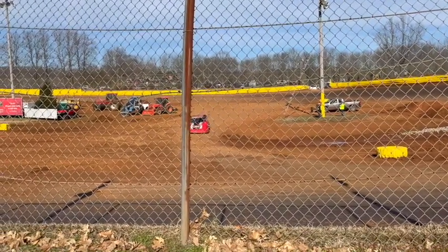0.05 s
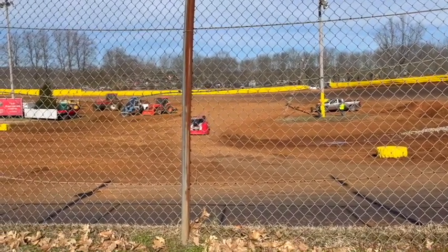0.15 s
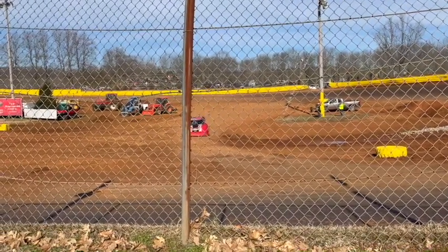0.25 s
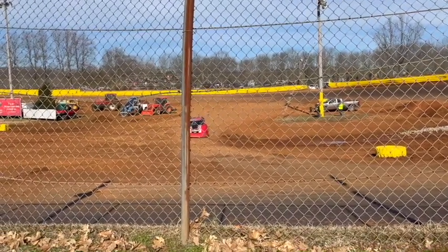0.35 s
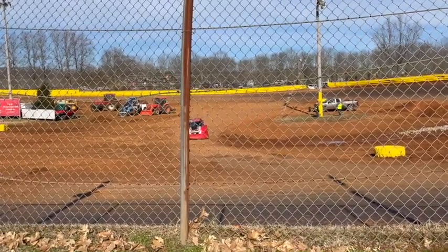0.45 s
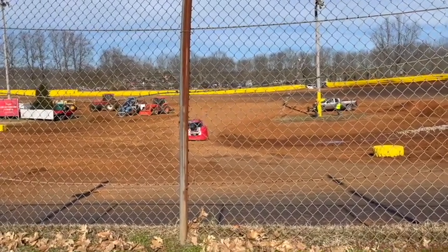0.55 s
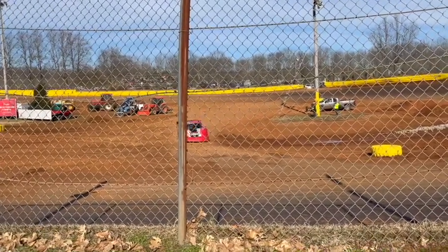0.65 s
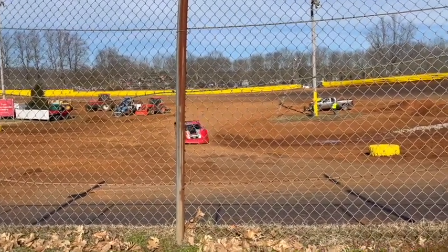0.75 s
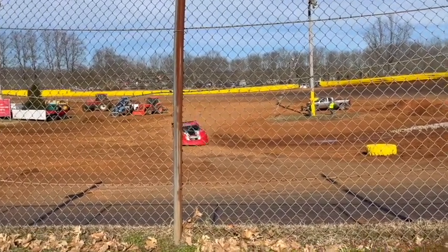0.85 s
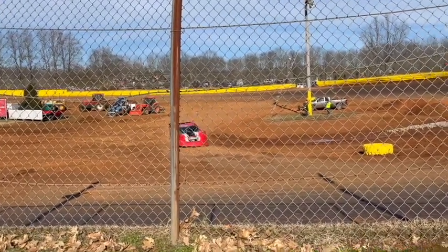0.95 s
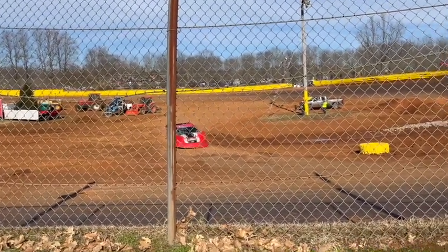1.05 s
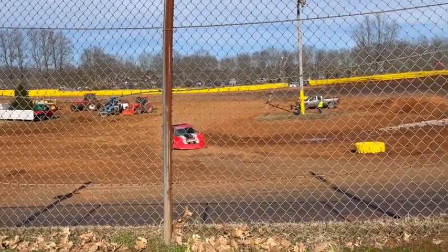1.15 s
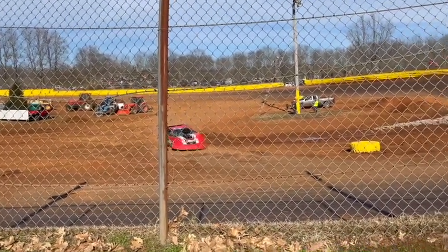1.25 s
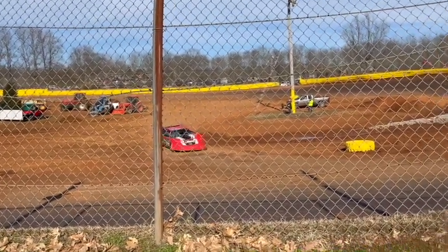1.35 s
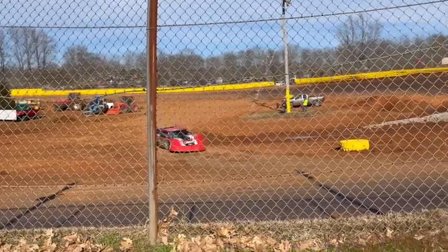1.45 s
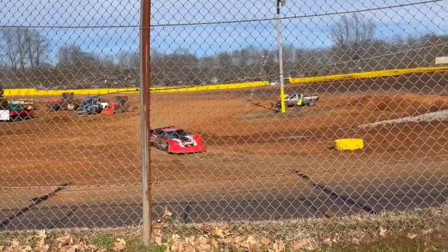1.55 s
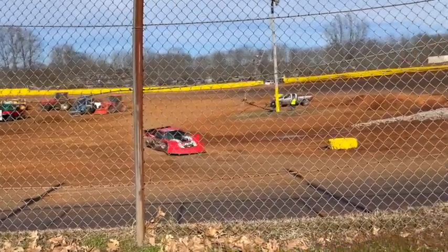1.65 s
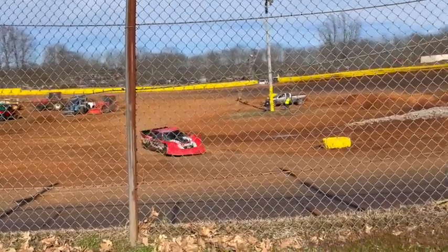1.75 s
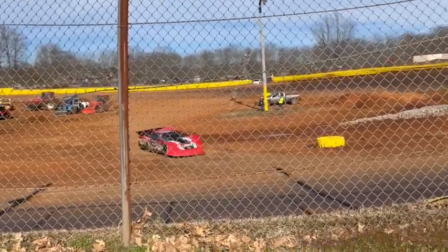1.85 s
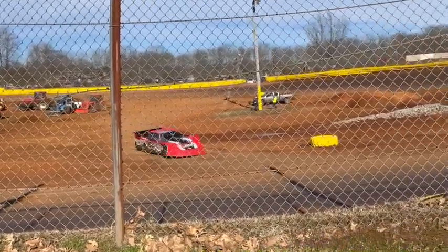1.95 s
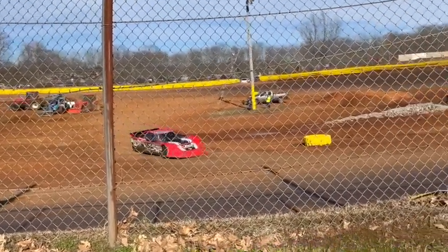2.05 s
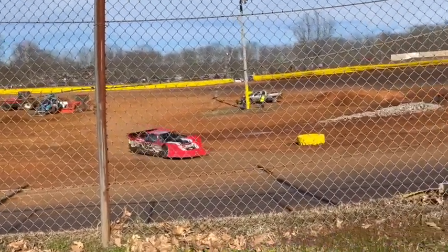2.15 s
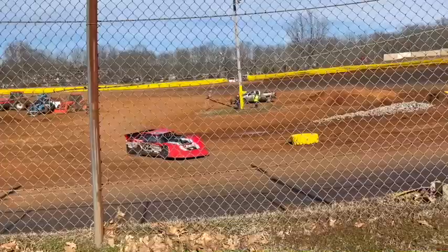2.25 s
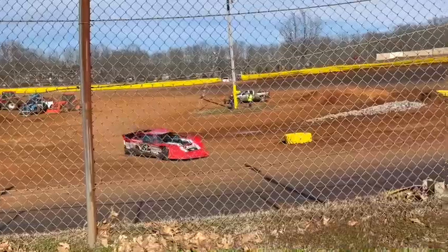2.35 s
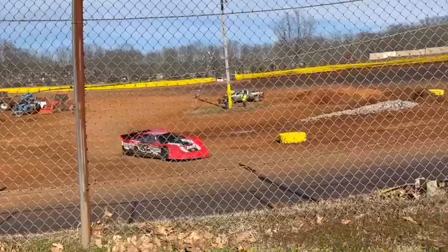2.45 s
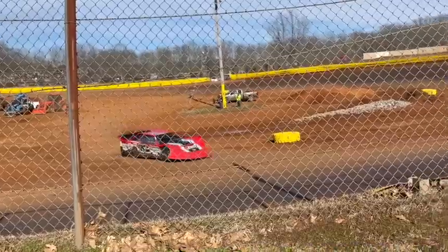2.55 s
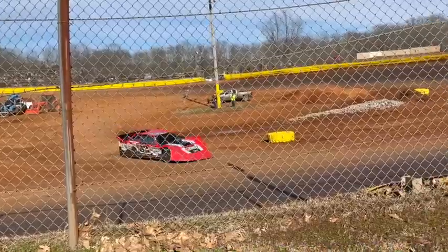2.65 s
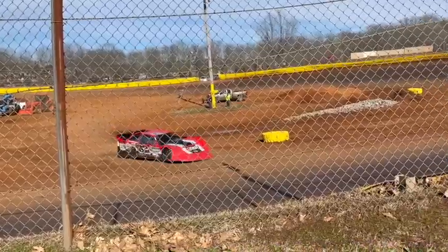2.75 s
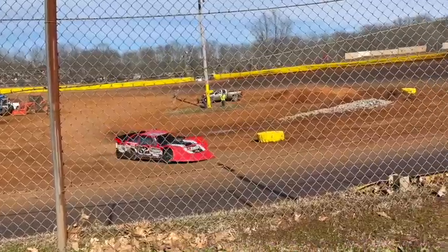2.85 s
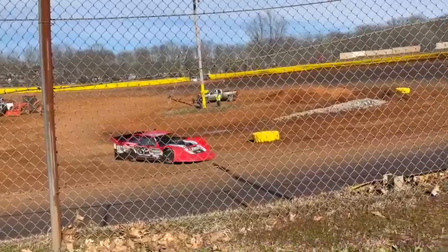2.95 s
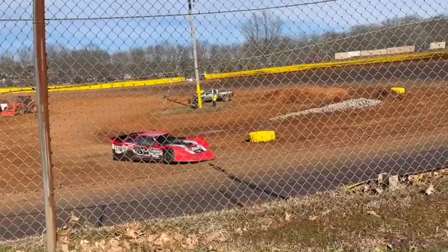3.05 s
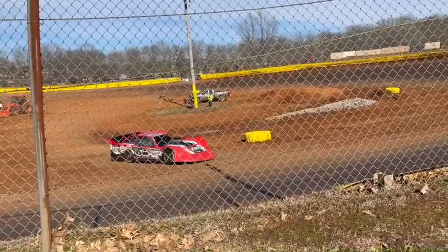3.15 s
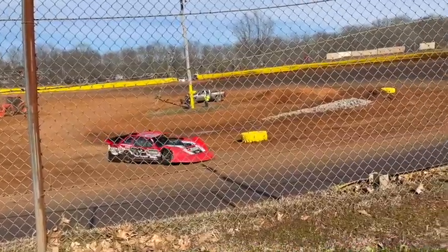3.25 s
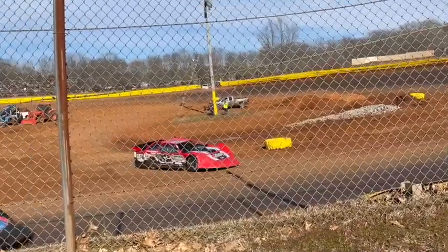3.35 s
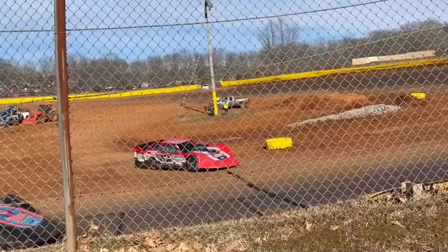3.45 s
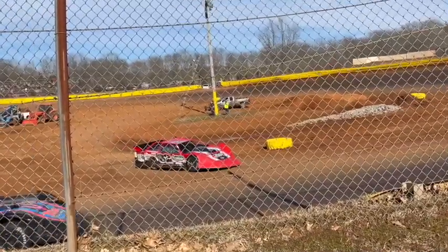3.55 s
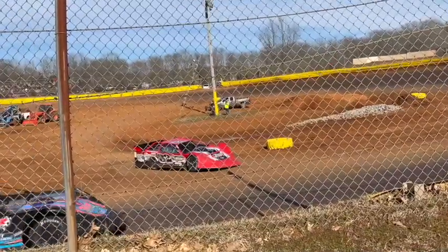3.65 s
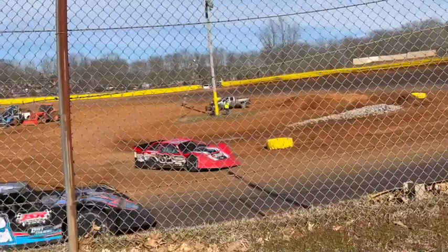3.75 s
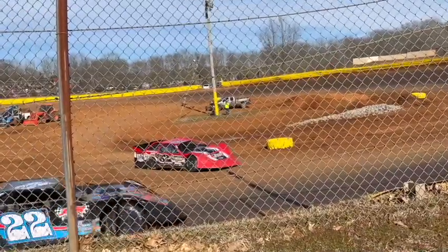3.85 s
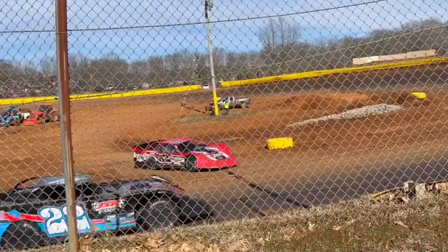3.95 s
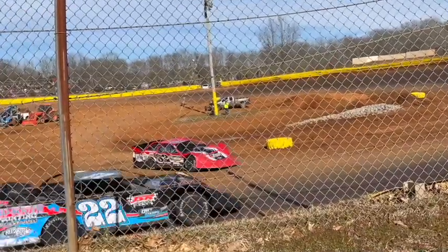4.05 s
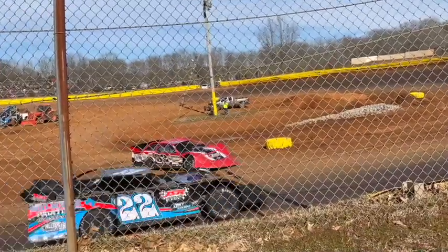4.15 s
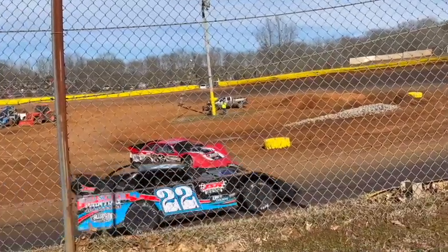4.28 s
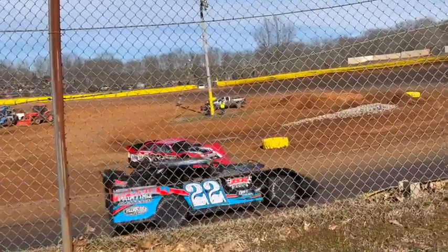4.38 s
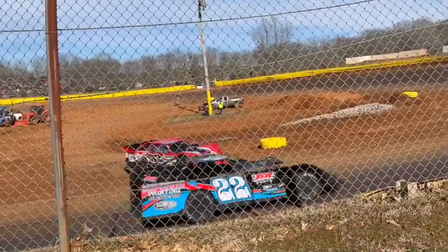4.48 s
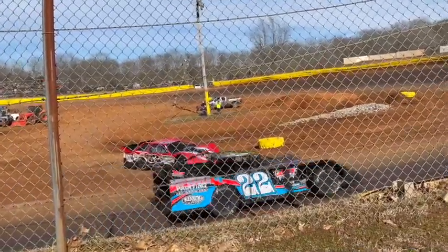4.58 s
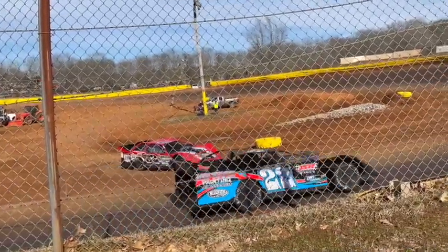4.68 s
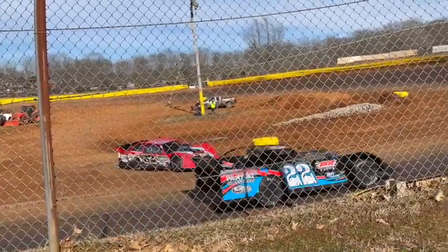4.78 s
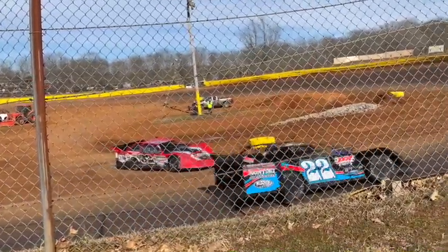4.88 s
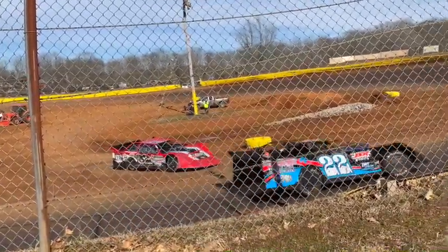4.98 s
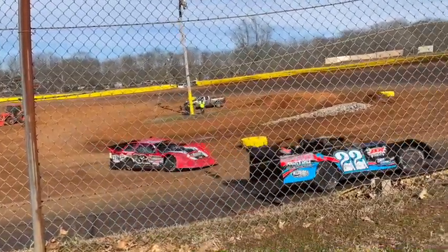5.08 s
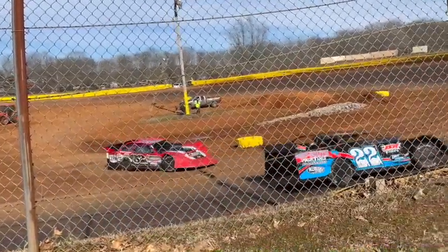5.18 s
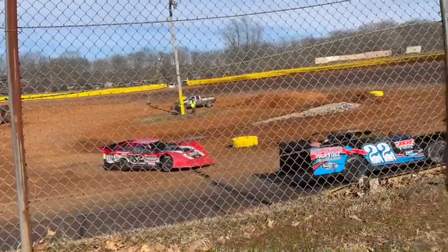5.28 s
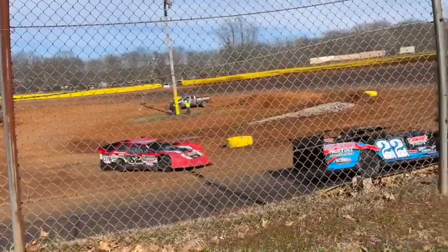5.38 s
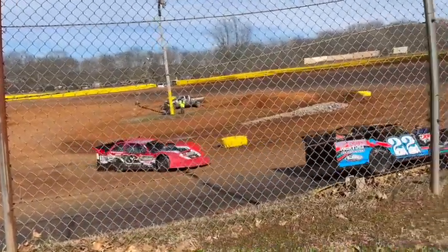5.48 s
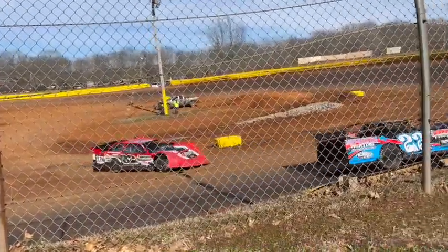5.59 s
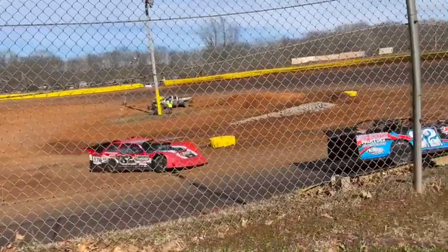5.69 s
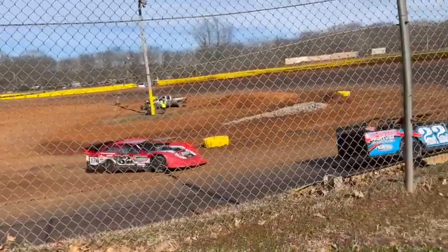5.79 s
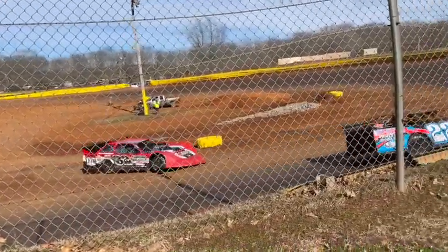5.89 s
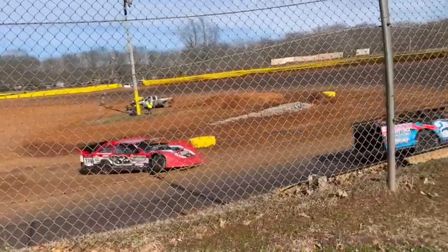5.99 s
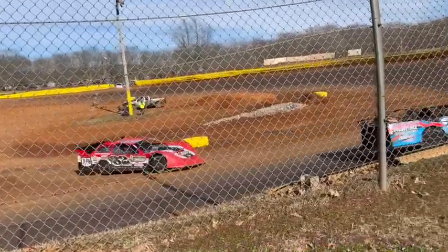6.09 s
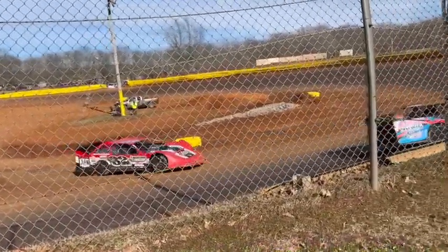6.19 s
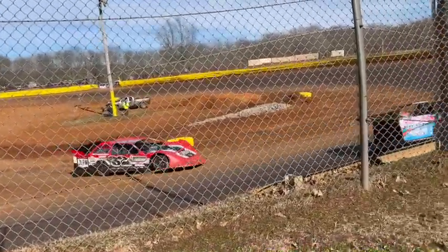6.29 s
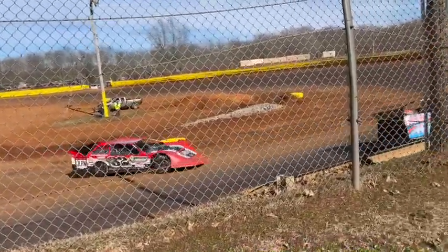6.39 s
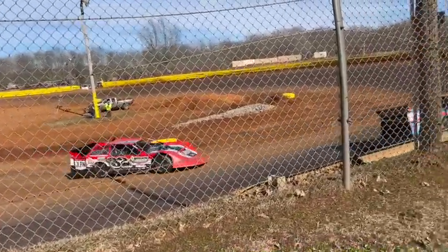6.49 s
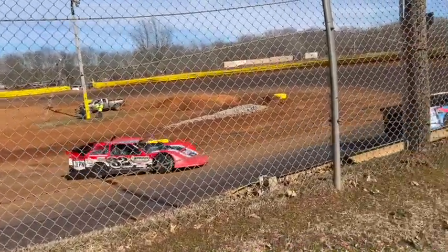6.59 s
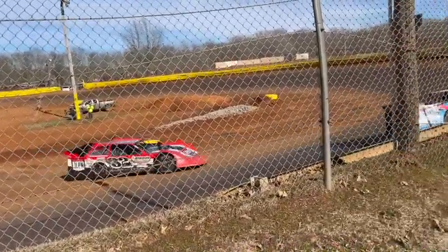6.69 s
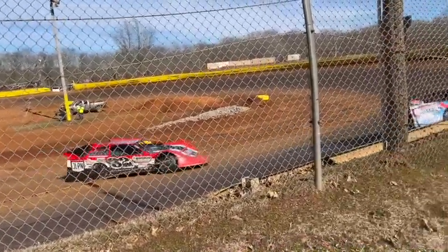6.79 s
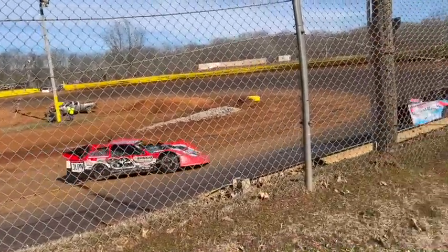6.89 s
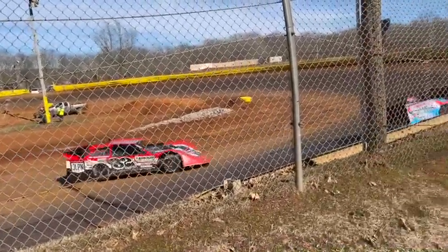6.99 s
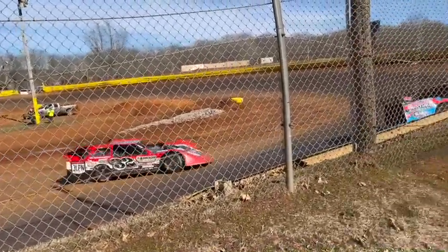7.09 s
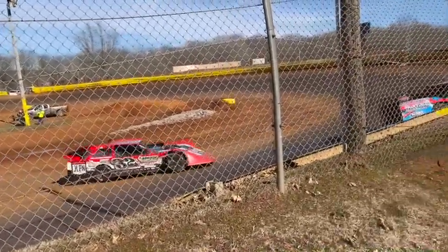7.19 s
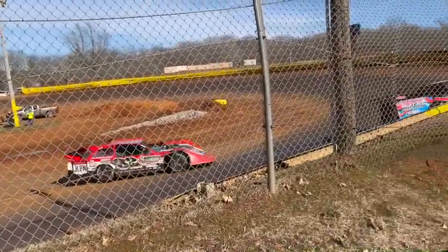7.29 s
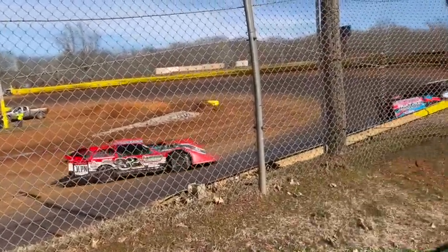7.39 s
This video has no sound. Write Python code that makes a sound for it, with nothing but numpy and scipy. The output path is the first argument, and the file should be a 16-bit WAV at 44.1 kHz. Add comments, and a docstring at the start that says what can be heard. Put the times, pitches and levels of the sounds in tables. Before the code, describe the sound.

A phone by the trackside fence picks up far-off racing engines, muffled and pulsing, slowly growing louder. A short clattering rattle and small brake squeaks come through. Suddenly a close V8 bursts in, nearly overloading the microphone, with rough roar and rapid exhaust pops. The pops thin out, one cylinder raps hard, headers rasp, and the engine hums steadily lower while tyres hiss and scrub over dirt.

```python
"""Distant V8 stock cars lope and throb on a dirt oval, something rattles and brakes squeak; then a near car
bursts in with a sharp click, popping on the overrun, and its revs wind down. Uneven firing pulses excite the
resonances of the open pipes, and one cylinder raps harder. Pressure pulses make the pops, burning gas roars and
rushing gas rings the headers. Filtered noise makes the click and the tyres' hiss and crunch on clay; dense echoes
come off the banking. A phone behind the catch fence picks it up through two ports."""
import sys
import numpy as np
from scipy import signal
from scipy.fft import rfft, irfft, next_fast_len
from scipy.io import wavfile
from scipy.ndimage import uniform_filter1d

SR = 44100
rng = np.random.default_rng(int(sys.argv[2]) if len(sys.argv) > 2 else 0)


def store_pcm(level_fs):
    """Save levels as 16-bit WAV."""
    pcm = np.round(np.clip(level_fs, -1, 1) * 32767).astype(np.int16)
    wavfile.write(sys.argv[1], SR, np.atleast_2d(pcm).T)


N = 327656
TIME = np.arange(N) / SR  # s


def undb(db):
    """Logarithmic level: decibels to amplitude gain."""
    return np.exp(np.asarray(db) * (np.log(10) / 20))


def curves(rows):
    """Linear interpolation: each column of a table joined by straight lines in time."""
    s, *columns = np.transpose(rows)
    return [np.interp(TIME, s, column) for column in columns]


def along(points, hz):
    """Logarithmic frequency scale: a spectrum's value at hz."""
    f, value = np.transpose(points)
    return np.interp(np.log(hz + 1), np.log(np.maximum(f, 0) + 1), value)


def colour(x, points, size=16384):
    """Minimum-phase filtering: a causal response, falling 12 dB an octave above its last point."""
    hz = np.arange(size // 2 + 1) * SR / size
    roll_off = np.maximum(hz / points[-1][0], 1) ** 2
    cepstrum = irfft(np.log(undb(along(points, hz)) / roll_off))
    # folding the cepstrum onto positive time makes the response causal
    cepstrum[1:size // 2] *= 2
    cepstrum[size // 2 + 1:] = 0
    response = irfft(np.exp(rfft(cepstrum)))
    return signal.oaconvolve(x, response)[:N]


def steady(x, span_s):
    """Power normalisation: bring the running rms near 1, keeping faster flutter."""
    k = int(span_s * SR)
    power = uniform_filter1d(uniform_filter1d(x ** 2, k), k)
    return x / np.sqrt(np.abs(power) + 1e-4 * np.mean(x ** 2))


def clicks(times, sizes):
    """Impulsive excitation: one impulse at each time."""
    at = np.clip(np.asarray(times) * SR, 0, N).astype(int)
    return np.bincount(at, sizes, N + 1)[:N]


def wander(rate_hz):
    """Slow random modulation: smoothed chance, spread near 1."""
    k = int(SR / rate_hz)
    steps = np.repeat(rng.standard_normal(N // k + 1), k)
    return 1.3 * uniform_filter1d(steps, k)[:N]


def swell(s, spread_s):
    """Gaussian envelope: a smooth rise and fall around a moment."""
    return np.exp(-.5 * ((TIME - s) / spread_s) ** 2)


def passing(s, half_s):
    """Directivity: gain of a part that turns towards the fence and away, halved half_s either side."""
    return 1 / (1 + ((TIME - s) / half_s) ** 2)


def ring(x, modes):
    """Modal resonance: second-order resonators side by side."""
    return sum(undb(db) * signal.lfilter(*signal.iirpeak(hz, hz / width, SR), x) for hz, width, db in modes)


def ring_twice(x, hz, width_hz):
    """Cascaded resonance: one mode applied twice, for steeper skirts."""
    mode = [(hz, width_hz, 0)]
    return ring(ring(x, mode), mode)


def echoes(x, t60):
    """Diffuse reverberation: a dense, exponentially decaying tail of unit energy."""
    tail = rng.standard_normal(SR) * undb(-60 * TIME[:SR] / t60)
    return signal.fftconvolve(x, tail / np.linalg.norm(tail))[:N]


# sideways share of the echoes: frequency_hz [Hz], level_db [dB]
ECHO_SPREAD = [(60, -17.5), (110, -21.5), (200, -9), (370, -6.5), (540, 3), (800, -5), (1300, 4), (2300, 3),
               (6000, -25)]
ECHO_SHIFT_HZ = 2.7  # Doppler shift of the echoes against the direct sound


def place(x, side_db, t60):
    """Scattering and Doppler shift: direct sound in the middle, echoes of a moving car from the sides."""
    side = undb(side_db) * colour(echoes(x, t60), ECHO_SPREAD)
    analytic = signal.hilbert(side, next_fast_len(N))[:N]
    side = np.real(analytic * np.exp(2j * np.pi * ECHO_SHIFT_HZ * TIME))
    return np.array([x + side, x - side])


# bank of each successive firing: facing [1 facing bank, 0 other bank]
FIRING_BANK = np.array([1, 0, 1, 1, 0, 1, 0, 0])


def v8(cycles, scatter_db, other_bank, lag_s, jitter_s, gas, puff_s):
    """Pulse-train excitation: eight firings a cycle; the banks' uneven order and the late far bank give the lope."""
    slot = np.floor(cycles * len(FIRING_BANK)).astype(int)
    at = np.flatnonzero(np.diff(slot)) + 1
    facing = FIRING_BANK[slot[at] % len(FIRING_BANK)]
    strength, lateness = rng.standard_normal((len(at), 2)).T
    size = np.where(facing, 1, other_bank) * undb(scatter_db[at] * np.clip(strength, -2, 2))
    firing_s = at / SR + lag_s * (1 - facing) + jitter_s * lateness
    pulses = clicks(firing_s, size)
    # gas rushes out after each firing
    puff = signal.lfilter([1], [1, -np.exp(-1 / (puff_s * SR))], pulses)
    rush = puff * rng.standard_normal(N) * np.sqrt(2 / (puff_s * SR))
    return pulses - pulses.mean(), gas * rush, puff / puff.mean()


# distant cars' exhaust: start_s [s], boom_db [dB], bark_db [dB before the bark's trim]
FAR_LEVELS = [(0, -21.5, -36), (1.4, -20.5, -37), (2.4, -18.5, -33.5), (3.25, -17.5, -30),
              (4.2, -13, -30.5), (5.5, -24, -39.5), (7.4, -23.5, -41.5)]
# distant engines: first_cycle_hz [four-stroke cycles/s], last_cycle_hz [cycles/s], level_db [relative dB]
FAR_ENGINES = [(16.2, 18.6, -5.5), (12.6, 14.8, -6.5)]
# pipe boom and exhaust bark heard far off: frequency_hz [Hz], level_db [relative dB]
FAR_BOOM_SPECTRUM = [(25, -33.5), (42, -21.5), (60, -0.5), (76, 2), (88, 2), (108, -1.5), (135, -12),
                     (180, -17.5), (260, -26), (400, -77)]
FAR_BARK_SPECTRUM = [(120, -21), (205, 0.5), (245, 0.5), (285, 2), (310, -0.5), (360, 1), (410, -8),
                     (480, -5), (560, -11.5), (680, -18), (820, -18.5), (1300, -36), (3000, -58.5)]
# louder throbs: start_s [s, at the peak], rise_db [dB; the bark takes a share]
FAR_SURGES = [(.12, 6), (.19, 3.5), (.275, 3.5), (.322, 3.5), (1.288, 4), (1.75, 3), (2.148, 3), (2.35, 4),
              (2.56, 3.5), (2.78, 3.5), (2.97, 4)]
SURGE_SPREAD_S = 0.01
THROB_RATE_HZ, THROB_DB, THROB_BARK_SHARE = 22, 2, 0.83  # uneven surging


def far_cars():
    """Beating: cars hunting at a fast idle beat together and throb, blurred by echoes off the banking."""
    boom_db, bark_db = curves(FAR_LEVELS)
    exhaust = 0
    for start_hz, end_hz, db in FAR_ENGINES:
        hunting = 1 + .06 * wander(4) + .05 * wander(11)
        cycle_hz = np.linspace(start_hz, end_hz, N) * hunting
        cycles = np.cumsum(cycle_hz) / SR + rng.random()
        pulses, rush, _ = v8(cycles, np.full(N, 3.5), other_bank=.45, lag_s=.0036,
                             jitter_s=.0005, gas=.25, puff_s=.007)
        exhaust = exhaust + undb(db) * (pulses + rush)
    exhaust = exhaust + undb(-12) * echoes(exhaust, t60=.4)
    throb_db = THROB_DB * np.tanh(wander(THROB_RATE_HZ))
    throb_db = throb_db + sum(db * swell(s, SURGE_SPREAD_S) for s, db in FAR_SURGES)
    boom = steady(colour(exhaust, FAR_BOOM_SPECTRUM), 0.08) * undb(boom_db + throb_db)
    bark_db = bark_db + 1.5 + THROB_BARK_SHARE * throb_db + 1.4 * wander(9)
    bark = steady(colour(exhaust, FAR_BARK_SPECTRUM), 0.085) * undb(bark_db)
    return place(boom + bark, side_db=1.5, t60=0.078)


# rolling tyres: start_s [s], hiss_db [dB], grit_db [dB before the grit's trim]
ROLLING = [(0, -58, -82), (1, -56, -86), (1.6, -52.5, -78.5), (2.25, -48.5, -69.5), (2.95, -49, -70.5),
           (3.28, -49.5, -70.5), (3.42, -39, -57.5), (3.95, -43.5, -62.5), (4.65, -42.5, -60),
           (5.6, -46.5, -65.5), (6.3, -51, -68), (7.4, -53, -71.5)]
# brief bursts of noise: start_s [s, at the peak], spread_s [s], hiss_db [dB], grit_db [dB before trim]
NOISE_BURSTS = list([(.058, 0.0024, -83, -61), (.122, 0.012, -54.5, -83), (.73, 0.016, -59.5, -79),
                     (1.205, 0.033, -45, -71.5), (2.56, 0.02, -46, -64), (3.17, 0.04, -44, -68),
                     (3.298, 0.0012, -33, -49), (3.367, 0.021, -36, -54), (4.36, 0.021, -38.5, -64),
                     (4.64, .03, -43, -59)])
ENTRY_CLICK = NOISE_BURSTS[6]  # a sharp broadband click as the near car's sound cuts in
TYRE_SCUFFS = NOISE_BURSTS[:6] + NOISE_BURSTS[7:]  # tyres scuff the clay
# a tyre rubs about once a turn: start_s [s, at the peak], hiss_db [dB]
TYRE_SCRUBS = [(6.08, -49.5), (6.358, -46), (6.627, -45.5), (6.815, -45.5), (7.05, -46.5), (7.275, -44.5)]
SCRUB_SPREAD_S, SCRUB_GRIT_DB = 0.04, -20  # grit against hiss


def noise_gains():
    """Addition of powers: gains of hiss and grit from steady rolling, scuffs, scrubs and the entry click."""
    scrubs = [(s, SCRUB_SPREAD_S, db, db + SCRUB_GRIT_DB) for s, db in TYRE_SCRUBS]
    power = undb(curves(ROLLING)) ** 2
    for s, spread_s, hiss_db, grit_db in TYRE_SCUFFS + scrubs + [ENTRY_CLICK]:
        power = power + np.outer(undb([hiss_db, grit_db]), swell(s, spread_s)) ** 2
    return np.sqrt(power) * undb(.7 * wander(20))


# rolling hiss and crunching clay: frequency_hz [Hz], level_db [relative dB]
HISS_SPECTRUM = [(500, -2), (1100, 2.5), (1320, 6), (1550, 3.5), (1800, 0.5), (2250, -2), (2550, 0.5),
                 (2850, -5), (3250, -3), (4050, -6), (4800, -11.5), (7000, -12.5), (10000, -30.5),
                 (15000, -40)]
GRIT_SPECTRUM = [(2000, -18.5), (4500, -1.5), (7500, -1.5), (10000, 3.5), (14500, -4)]
CRUMBS_PER_S = 5000


def tyres_and_click(puff):
    """Broadband noise: tyre hiss roughened by the near exhaust, crumbs of clay, and a click from the same noise."""
    hiss_gain, grit_gain = noise_gains()
    layers = []
    for _ in range(2):
        rough = (1 + 0.34 * (puff - 1)) * undb(1.4 * wander(90))
        hiss = steady(colour(rng.standard_normal(N) * rough, HISS_SPECTRUM), 0.26)
        crumb_size = undb(2.0 * np.minimum(rng.exponential(size=N), 6)) * rng.standard_normal(N)
        crumbs = (rng.random(N) < CRUMBS_PER_S / SR) * crumb_size
        grit = steady(colour(crumbs, GRIT_SPECTRUM), .1) * undb(5)
        layers.append(hiss * hiss_gain + grit * grit_gain)
    # a little different at each port
    mid, side = layers[0], undb(-11.0) * layers[1]
    return np.array([mid + side, mid - side])


# knocks of the rattle: start_s [s], level_db [relative dB]
RATTLE_KNOCKS = [(1.144, -14), (1.161, -11), (1.175, -2.5), (1.182, -4.5), (1.188, -9), (1.199, 0),
                 (1.204, 2), (1.217, -8), (1.224, -8.5)]
# what the rattle rings with: pitch_hz [Hz], width_hz [Hz], level_db [relative dB]
RATTLE_MODES = [(412, 50, -2), (900, 50, 5), (1020, 130, 4), (1150, 130, 4), (1730, 60, 2), (1900, 60, 3),
                (2510, 120, -4), (2840, 60, -7), (3820, 500, -18)]


def rattle():
    """Impact excitation of modes: something loose knocks in a quick, uneven run."""
    s, db = np.transpose(RATTLE_KNOCKS)
    # a soft contact gives the blows little treble: Hz, dB
    soft_contact = [(400, 0.5), (650, -3.5), (900, -3.5), (1200, -12.5),
                    (2000, -17.0), (4200, -24.5), (5200, -35.0), (9000, -29)]
    blows = colour(clicks(s, undb(db)), soft_contact)
    sound = ring(blows + undb(-1) * echoes(blows, t60=0.12), RATTLE_MODES)
    sound = sound / np.linalg.norm(sound) * undb(6)
    return place(sound, side_db=-13.5, t60=0.11)


# brake squeaks: start_s [s, at the peak], spread_s [s], pitch_hz [Hz], level_db [dB]
BRAKE_SQUEAKS = [(2.253, .06, 2330, -50.5), (2.89, .02, 1056, -39), (4.234, 0.027, 1180, -38)]
SQUEAK_WIDTH = .11  # width of the disc's mode, share of its pitch


def squeaks():
    """Friction-excited resonance: brakes catch and ring one disc mode, too briefly to settle into a tone."""
    sound = 0
    for s, spread_s, hz, db in BRAKE_SQUEAKS:
        squeak = steady(ring_twice(rng.standard_normal(N), hz, SQUEAK_WIDTH * hz), 0.018)
        sound = sound + squeak * undb(db) * swell(s, spread_s)
    return place(sound, side_db=-11.5, t60=.1)


NEAR_START_S = 3.296
OVERRUN_FADE_DB_PER_S = 8.5


def entry():
    """Onset transient: the near car's sound arrives all at once."""
    return np.clip((TIME - NEAR_START_S) / 0.0052, 0, 1)


def overrun():
    """Exponential decay: gain of the afterburning, strongest as the near car bursts in."""
    return entry() * undb(-OVERRUN_FADE_DB_PER_S * (TIME - NEAR_START_S))


# roar of burning gas: frequency_hz [Hz], level_db [relative dB]
ROAR_SPECTRUM = [(120, -11), (190, 1.5), (450, 1.5), (620, -6), (820, -8.5), (1000, -22.5), (1400, -38.5)]
ROAR_DB, ROAR_HOLD_S, ROAR_FADE_DB_PER_S = -23.5, .25, 20.5


def roar():
    """Turbulent combustion noise: gas tumbles burning from the open pipe, a dense roar between the bangs."""
    tumbling = rng.standard_normal(N) * undb(3.3 * wander(110))
    gas = steady(colour(tumbling, ROAR_SPECTRUM), .05)
    fading_s = np.maximum(TIME - NEAR_START_S - ROAR_HOLD_S, 0)
    level = undb(ROAR_DB - ROAR_FADE_DB_PER_S * fading_s)
    return place(gas * entry() * level, side_db=2, t60=0.077)


# exhaust pops: start_s [s], thud_db [dB, the table's maximum sets the layer's peak], edge_db [relative dB]
EXHAUST_POPS = [(3.208, -18.5, -42), (3.304, -1.5, -34), (3.336, -6, -43), (3.362, -6.5, -34.5),
                (3.415, -13.5, -42.5), (3.461, -5, -35.5), (3.496, -5, -30), (3.575, -11.5, -38),
                (3.646, -11, -36.5), (3.681, -7.5, -30), (3.723, -10.5, -47.5), (3.767, -8.5, -37),
                (3.781, -5, -38), (3.796, -4.5, -38.5), (3.827, -9.5, -21.5), (3.868, -9.5, -47),
                (3.93, -11.5, -36.5), (3.996, -6.5, -46), (4.036, -7, -41), (4.393, -7, -48),
                (4.5, -15, -38), (4.663, -11.5, -39.5), (4.814, -8.5, -34), (4.864, -14, -43),
                (5.172, -13.5, -42), (5.182, -14.5, -32), (5.421, -11.5, -49), (5.98, -16, -44),
                (6.345, -16.5, -44.5), (6.574, -17, -45), (7.161, -22, -53)]
# a pop in the pipe, and its sharp edge: frequency_hz [Hz], level_db [relative dB]
POP_SPECTRUM = [(60, -12), (150, 19), (280, 1), (425, 11), (500, 1.5), (600, -2.5), (780, -7.5),
                (1100, -22), (1400, -21.5), (2500, -39.5), (8000, -57.5)]
POP_EDGE_SPECTRUM = [(400, -35), (800, -0.5), (1200, 0), (1550, 1), (2000, -34.5), (5000, -46)]


def pops():
    """Impulse response of a pipe: unburnt fuel goes off in hard pressure pulses, some with a sharp edge."""
    s, db, edge_db = np.transpose(EXHAUST_POPS)
    thud = colour(clicks(s, undb(db)), POP_SPECTRUM)
    edge = colour(clicks(s, undb(edge_db)), POP_EDGE_SPECTRUM)
    thud = thud / np.abs(thud).max() * undb(db.max())
    edge = edge / np.abs(edge).max() * undb(-11)
    return place(thud + edge, side_db=-8.5, t60=0.098)


HARD_FIRING_S = 5.057  # one firing of the hard cylinder


def cycles_of(cycle_hz):
    """Phase as the integral of frequency: near engine cycles, counted from a firing of its hard cylinder."""
    cycles = np.cumsum(cycle_hz) / SR
    return cycles - np.interp(HARD_FIRING_S, TIME, cycles)


# gusts of exhaust on the overrun: frequency_hz [Hz], level_db [relative dB]
GUST_SPECTRUM = [(15, -24.5), (40, -2.5), (60, 2), (110, -19.5)]
CRACKLE_DB, GUST_DB = -19, -25  # as the near car bursts in


def crackle(cycle_hz):
    """Irregular pulse excitation: off the throttle, charges burn late in the pipe and push out gusts of gas."""
    burns, rush, _ = v8(cycles_of(cycle_hz), np.full(N, 3.0), other_bank=.35, lag_s=.003,
                        jitter_s=.0012, gas=.3, puff_s=.005)
    gusts = steady(colour(burns + rush, GUST_SPECTRUM), 0.22) * undb(GUST_DB)
    crackling = steady(colour(burns + rush, POP_SPECTRUM), 0.11) * undb(CRACKLE_DB)
    return (crackling + gusts) * overrun()


# the hard cylinder's rap in the pipe: frequency_hz [Hz], level_db [relative dB]
RAP_SPECTRUM = [(100, -23.5), (200, -6), (350, -6), (460, 6), (560, -1), (700, -14), (1150, -18),
                (1500, -30.5), (2500, -36)]
RAP_DB, RAP_LOUDEST_S, RAP_SPREAD_S = -7, 4.97, 0.33  # level against the bark, before its swell


def hard_cylinder(cycle_hz):
    """Subharmonic accent: one cylinder fires harder than the rest and raps the pipe once a cycle."""
    s = TIME[np.flatnonzero(np.diff(np.floor(cycles_of(cycle_hz))))]
    raps = colour(clicks(s, undb(2.0 * rng.standard_normal(len(s)))), RAP_SPECTRUM)
    return raps / raps.std() * undb(RAP_DB) * (0.18 + swell(RAP_LOUDEST_S, RAP_SPREAD_S))


# headers turning to the fence: start_s [s, at the peak], half_s [s], rasp_db [dB],
# pitch_hz [Hz, collector], collector_db [dB]
HEADER_PASSES = [(2.3, 0.35, -53, 376, -37.5), (4.65, 0.6, -41, 447, -35.5)]
# what the headers ring with: pitch_hz [Hz], width_hz [Hz, before widening], level_db [relative dB]
HEADER_MODES = [(951, 45, 4), (1140, 80, 5), (1280, 60, 5.5), (1682, 38, 6), (1840, 80, 0), (2100, 90, -7),
                (2550, 150, -11), (3230, 110, -11), (3550, 220, -15), (4020, 400, -13)]
RASP_BURST_DB = -47  # as the near car bursts in
# where the headers join: width as a share of its pitch; it faces the fence after them
COLLECTOR_WIDTH, COLLECTOR_LATER_S = .2, .08
RAP_PUFF_DB, RAP_PUFF_CYCLES = 5, 0.27  # hard cylinder's puff: strength against the steady flow, decay


def rasp(puff):
    """Flow-excited modes: gas rings thin headers and collectors, most after the hard cylinder fires."""
    since_hard_firing = cycles_of(curves(NEAR_REVS)[0]) % 1
    hard_puff = np.exp(-since_hard_firing / RAP_PUFF_CYCLES) * swell(RAP_LOUDEST_S, RAP_SPREAD_S)
    gas = rng.standard_normal(N) * (1 + 0.5 * (puff - 1) + undb(RAP_PUFF_DB) * hard_puff)
    power = (undb(RASP_BURST_DB) * overrun()) ** 2
    collectors = 0
    for s, half_s, db, drone_hz, drone_db in HEADER_PASSES:
        power = power + (undb(db) * passing(s, half_s)) ** 2
        drone = steady(ring_twice(gas, drone_hz, COLLECTOR_WIDTH * drone_hz), 0.14)
        collectors = collectors + drone * undb(drone_db) * passing(s + COLLECTOR_LATER_S, half_s)
    headers = sum(undb(db) * ring_twice(gas, hz, 1.5 * width) for hz, width, db in HEADER_MODES)
    sound = steady(headers, 0.18) * np.sqrt(power) + collectors
    return place(sound * undb(1.0 * wander(18)), side_db=-13.5, t60=0.039)


# near engine speed: start_s [s], cycle_hz [four-stroke cycles/s]
NEAR_REVS = [(3.3, 27.2), (3.6, 26.8), (4.1, 26.7), (4.3, 26.9), (4.45, 25.7), (4.75, 25.6), (4.95, 25.0),
             (5.15, 25.3), (5.33, 24.2), (5.52, 24.2), (5.66, 23.2), (5.92, 22.0), (6.1, 22.2),
             (6.25, 21.4), (6.45, 21.7), (6.58, 20.4), (6.72, 17.9), (7.05, 18.0), (7.25, 16.8),
             (7.43, 16.5)]
# near exhaust: start_s [s], boom_db [dB before trim], bark_db [dB before trim]
NEAR_LEVELS = [(3.3, -8, -20), (3.6, -7, -19), (3.85, -10.5, -20.5), (4.17, -6, -21), (4.95, -16, -24),
               (5.6, -9, -25), (6.0, -12, -27), (6.55, -12.5, -27.5), (6.7, -15, -31.5),
               (6.78, -11.5, -30.5), (7.4, -10.5, -32)]
# scatter of firing strength: start_s [s], scatter_db [dB]
NEAR_MISFIRE = [(3.3, 1.5), (4.4, 5), (4.75, 1), (5.3, 0), (5.8, 3), (7.4, 4.5)]
# near pipe boom and exhaust bark: frequency_hz [Hz], level_db [relative dB]
NEAR_BOOM_SPECTRUM = [(25, -40), (47, -23.5), (64, 1), (85, 3.5), (108, 2), (135, -11), (175, -14.5),
                      (240, -28), (400, -60)]
NEAR_BARK_SPECTRUM = [(120, -34), (205, -17.5), (245, -4.5), (280, 2.5), (335, 1), (400, -6), (480, -5),
                      (600, -12), (750, -26.5), (1100, -23.5), (1600, -36.5), (2500, -51)]
# humming harmonics: start_s [s], third_db [dB], fifth_db [dB]
HUM_LEVELS = [(3.3, -31, -21.5), (3.8, -27, -24), (3.95, -15.5, -19.5), (4.3, -18, -25), (4.75, -20.5, -18),
              (5.1, -18.5, -19.5), (5.6, -17, -22), (6.1, -20, -17.5), (6.55, -20.5, -17),
              (6.7, -26.5, -20.5), (6.9, -40, -16.5), (7.4, -43.5, -17.5)]
# upper harmonics that sing as they cross the pipe's modes: multiple [of cycle_hz], level_db [dB against bark]
SINGING_HARMONICS = [(7, 0.5), (8, -1), (11, -0.5), (13, -2.5), (18, -4.5), (19, -5), (22, -4.5)]
HUM_WAVER_RAD, HUM_FLUTTER_DB = .28, 2.2


def near_car():
    """Source and resonator: the pipe's lowest mode booms, upper modes bark; regular firing hums."""
    boom_db, bark_db = curves(NEAR_LEVELS)
    cycle_hz, scatter_db = curves(NEAR_REVS)[0], curves(NEAR_MISFIRE)[0]
    cycles = cycles_of(cycle_hz * (1 + .011 * wander(14)))
    pulses, rush, puff = v8(cycles, scatter_db, other_bank=0.58, lag_s=0.002826,
                            jitter_s=0.00042, gas=0.6, puff_s=0.011)
    boom = steady(colour(pulses + 1.3 * rush, NEAR_BOOM_SPECTRUM), .09) * undb(boom_db - 4.6)
    bark = steady(colour(pulses + rush, NEAR_BARK_SPECTRUM), 0.14) * undb(1.4 * wander(15))
    bark = (bark + hard_cylinder(cycle_hz)) * undb(bark_db - 0.5)

    phase = 2 * np.pi * np.cumsum(cycle_hz * (1 + .007 * wander(16))) / SR
    third_db, fifth_db = curves(HUM_LEVELS)
    # upper harmonics only stand out while the engine fires evenly, once the afterburning has eased
    uneven_db = 1.78 * (scatter_db - scatter_db.min()) + 14 * overrun() ** 2
    harmonics = [(3, third_db), (5, fifth_db)]
    for k, db in SINGING_HARMONICS:
        mode_db = along(NEAR_BARK_SPECTRUM, k * cycle_hz)
        harmonics.append((k, bark_db + db + mode_db - uneven_db))
    hum = 0
    for k, db in harmonics:
        tone = np.sqrt(2) * np.sin(round(k) * phase + HUM_WAVER_RAD * wander(25))
        hum = hum + tone * undb(db + HUM_FLUTTER_DB * wander(22))
    car = place(entry() * (boom + bark + hum + crackle(cycle_hz)), side_db=-7.0, t60=0.042)
    return car, 1 + entry() * (puff - 1)


def scene():
    """Superposition: all the sources add at the fence."""
    car, puff = near_car()
    background = far_cars() + tyres_and_click(puff) + rattle() + squeaks()
    return background + roar() + pops() + rasp(puff) + car


# phase between the two microphone ports: frequency_hz [Hz], left_lead_rad [rad]
PORT_LEAD = [(0, 0), (860, -0.1), (1550, 3.4), (1810, 6.3), (2760, 7.1), (3790, 6.7), (4820, 7.0),
             (5680, 5.3), (6290, 5.6), (7670, 3.3), (8960, 3.1), (10600, 0.3), (13000, -0.2), (14500, -3.1)]
# level between the ports: frequency_hz [Hz], left_minus_right_db [dB]
PORT_LEVEL = [(60, 0.5), (110, 1.0), (200, 1.0), (370, 0.5), (680, 3.0), (1250, 0.5), (2300, 2.5),
              (4230, 3.0), (7770, 0.5), (14300, 0.0)]
TOP_HZ = 14700


def record(dry):
    """Interchannel difference and saturation: ports differ in phase and level, peaks round, the top is cut."""
    hz = np.arange(N + 1) * SR / (2 * N)
    # each port takes half of the difference
    port = undb(along(PORT_LEVEL, hz) / 2) * np.exp(.5j * along(PORT_LEAD, hz))
    mirrored = np.hstack([dry, dry[:, ::-1]])  # no jump where the transform wraps round
    heard = irfft(rfft(mirrored) * np.array([port, 1 / port]))[:, :N]
    rounded = heard / (1 + (heard / .97) ** 6) ** (1 / 6)
    low_pass = signal.ellip(8, .2, 70, TOP_HZ, fs=SR, output="sos")
    return signal.sosfilt(low_pass, rounded)


dry = scene()
out = record(dry)
store_pcm(out)
```